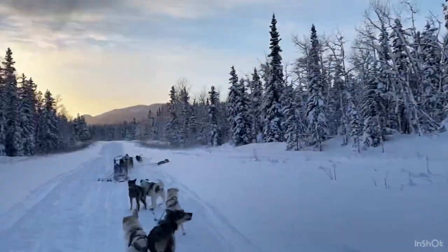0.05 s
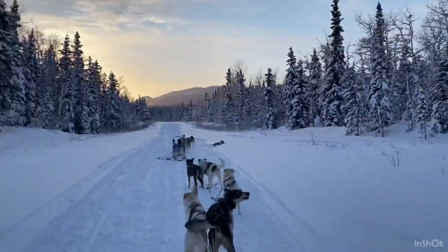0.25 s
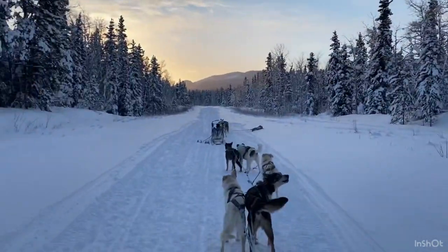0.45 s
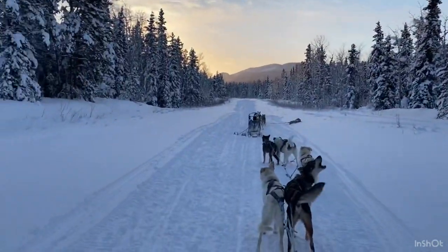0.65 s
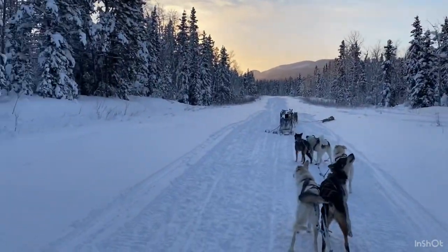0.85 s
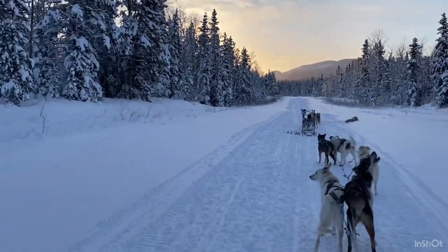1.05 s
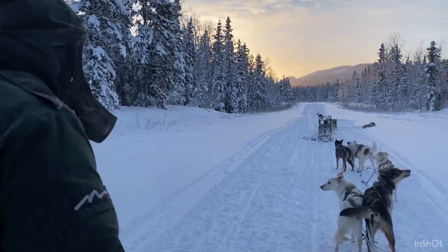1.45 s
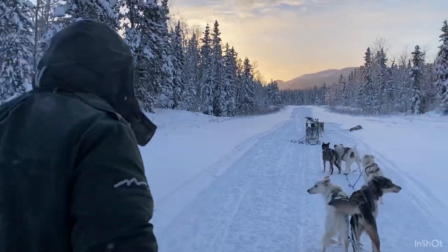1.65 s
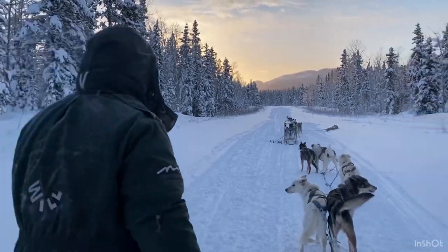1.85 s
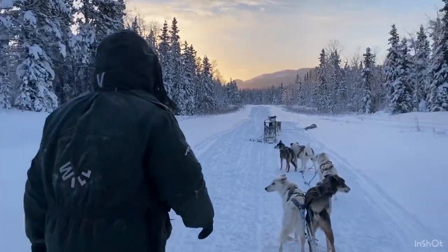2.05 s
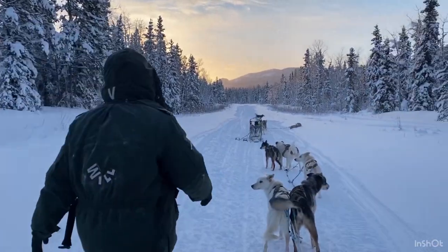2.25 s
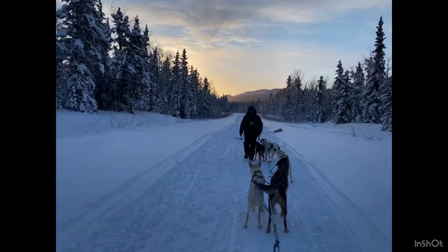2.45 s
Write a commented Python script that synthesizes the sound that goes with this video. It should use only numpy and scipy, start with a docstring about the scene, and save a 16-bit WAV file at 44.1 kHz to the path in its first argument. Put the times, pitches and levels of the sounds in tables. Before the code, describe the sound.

A sled dog barks gruffly four times close by while other dogs whine and yelp.

```python
"""A snowy trail among trees, harnessed sled dogs waiting, a stereo microphone beside the nearest.
Close up, that dog gives four gruff barks, two voices beating in its throat. Further up the line its
team mates whine thinly through the nose and yelp. Someone walks past the microphone, coat rustling
and boots crunching in the snow. The sound stops dead shortly before the end."""
import sys
import numpy as np
from scipy import signal
from scipy.fft import rfft, irfft
from scipy.io import wavfile
from scipy.ndimage import uniform_filter1d, minimum_filter1d

SR = 44100
rng = np.random.default_rng(int(sys.argv[2]) if len(sys.argv) > 2 else 0)


def persist_wave(psi):
    """Save psi, clipped to +-1, as 16-bit WAV."""
    counts = np.round(np.clip(psi, -1, 1) * 32767).astype(np.int16)
    wavfile.write(sys.argv[1], SR, np.atleast_2d(counts).T)


N = 114660
T = np.arange(N) / SR

# The nearest dog's barks, levels relative:
# start t/s, attack/s, hold/s, release/s, level/dB, whoop t/s, whoop level/dB, teeth hiss level/dB
BARKS = [(.306, 0.043, 0.039, 0.046, -11.5, 0.49, -40, -47.5),
         (0.615, 0.038, 0.056, 0.052, -12, .793, -20, -52.5),
         (0.923, 0.03, .025, 0.08, -11, 1.082, -20, -52.5),
         (1.255, 0.054, 0.033, 0.074, -15.5, 1.383, -22.5, -53.5)]
# Pitch arches of each bark: middle t/s, half length/s, top f/Hz of the low voice, then of the high
PITCH_ARCHES = [(.382, 0.066, 438.7, 0.38, 0.089, 502.5), (.71, .086, 426, .712, .102, 512),
                (1.005, .092, 427.9, 1.01, 0.089, 521), (1.345, 0.065, 422.3, 1.36, 0.088, 530)]

def bark(start, attack, hold, release, level_db, whoop_s, whoop_db, hiss_db, arches):
    """Close up: two voices arch in pitch and beat; the higher closes with a clear, falling whoop."""
    t = np.arange(start - .08, start + .22, 1 / SR)
    rise = np.maximum(1 - (t - start) / attack, 0)
    fall = np.maximum((t - start - attack - hold) / release, 0)
    push = amp(-13.5 * (rise ** 2 + fall ** 1.37))
    effort = amp(level_db) * push
    whoop = np.exp(-((t - whoop_s) / .02) ** 2)
    strain = push ** .21 * (1 - .5 * whoop)
    murmur = amp(level_db - 25) * np.exp(-((t - arches[0]) / .12) ** 4)  # faint, around the bark
    flutter_hz = 88 * (1 + .2 * wobble(t, rate_hz=88))
    flutter = 1 + .3 * strain * np.cos(angle(flutter_hz))  # loose throat tissue chops the rasp
    low = arches[:3], .36, amp(-1), 0
    high = arches[3:], .44, 1, amp(whoop_db) * whoop + murmur
    tone, drive = 0, 0
    for (mid, half, top_hz), rest_share, weight, hum in (low, high):
        arch = 1 / (1 + np.abs((t - mid) / half) ** np.where(t < mid, 5, 8))
        climb = 1 + .6 * (t - mid)
        hz = top_hz * (rest_share + (1 - rest_share) * arch * climb)
        phase = angle(hz * (1 + .0497 * strain * wobble(t, rate_hz=158)))
        force = weight * effort * (hz / top_hz) ** 2.55
        shake = 1 + .98 * strain * np.tanh(wobble(t, rate_hz=50))
        tone += (force + np.sqrt(2) * hum) * np.cos(phase) * shake
        drive += (force + amp(-19) * hum) * rasp(phase, rough=.27 + .17 * strain)
    hiss = highpass(rng.standard_normal(len(t)), hz=3500)
    gruff = np.sqrt(np.mean(effort ** 2)) * jaw(drive * flutter, t - start - attack)
    return t[0], amp(hiss_db) * push * hiss - amp(-5) * tone - amp(-.58) * gruff


def rasp(phase, rough):
    """Pulses of the vocal folds mixed with a puff of air in each cycle."""
    folds = sum(np.cos(k * phase) for k in range(1, 9))
    puffs = (1 + np.cos(phase)) * rng.standard_normal(len(phase))
    return (1 - rough) * unit(folds) + 2 * rough * unit(puffs)


# Throat resonances of the nearest dog: f/Hz, relative level/dB
BARK_THROAT = [(170, -45), (280, -29.5), (380, -3.5), (520, -4), (690, -3), (850, 5), (1000, 2.5),
               (1280, -6.5), (1560, -1.5), (1720, -9.5), (2050, -9), (2380, -15), (2700, -38.5),
               (3050, -28.5), (3600, -44), (5600, -39.5), (7500, -49), (15000, -56.5)]

def jaw(x, since_widest, open_s=.016, close_s=.078, muffle_hz=1754):
    """The jaws snap open and close slowly; half shut, they muffle the throat."""
    wide = colour(x, BARK_THROAT)
    shut = signal.sosfiltfilt(signal.butter(3, muffle_hz, fs=SR, output="sos"), wide)
    opening = np.exp(np.minimum(since_widest / open_s, -since_widest / close_s))
    return shut + (wide - shut) * opening


# The same dog's growls: start t/s, length/s, f/Hz, level/dB
GROWLS = [(.548, 0.082, 162, -43), (1.14, 0.12, 173.5, -42.5)]

def growl(start, length, hz, db):
    """A faint low hum in the throat as the next bark builds."""
    t = np.arange(0, length, 1 / SR)
    phase = angle(hz * (1 + .02 * wobble(t, rate_hz=40)))
    return start, amp(db) * swell(t, length) * unit(np.sin(phase))


# The team's whines, one curve each: t/s, f/Hz, level/dB, octave level/dB
WHINES = [
    [(0, 1620, -22, -42.5), (.03, 1569, -21.5, -53.5), (.05, 1542, -20, -69), (.22, 1571, -18, -67),
     (.255, 1565, -26, -66), (.283, 1577, -7.5, -68), (.31, 1544, -21.5, -72)],
    [(1.13, 1300, -55, -63), (1.2, 1511, -28.5, -47.5), (1.256, 1592, -29, -50.5), (1.33, 1617, -25, -56),
     (1.41, 1602, -27, -48.5), (1.43, 1485, -37, -52), (1.45, 1150, -50, -52)],
    [(1.44, 1640, -63, -79), (1.5, 1602, -35.5, -78), (1.6, 1600, -63, -75)],
    [(1.68, 901, -43, -67), (1.72, 1360, -34.5, -44), (1.755, 1539, -23, -49), (1.796, 1583, -34, -47.5),
     (1.84, 1578, -39, -44.5), (1.862, 1566, -28, -71), (1.885, 1577, -43, -57.5), (1.95, 1608, -34, -70)],
    [(1.95, 1572, -44, -66), (1.975, 1664, -27.5, -51), (1.999, 1591, -32, -47), (2.027, 1624, -26, -35),
     (2.045, 1654, -28.5, -50), (2.115, 1663, -21, -37), (2.16, 1655, -20, -54), (2.19, 1658, -24.5, -38),
     (2.235, 1641, -20, -37.5), (2.252, 1612, -35, -48), (2.262, 1668, -34.5, -65), (2.3, 1628, -36.5, -52),
     (2.335, 1590, -46, -63)],
]
# Where each whine sits at the microphone: left lead/ms, left minus right level/dB
WHINE_PLACES = [(-.27, -2), (.25, 0), (.2, 0), (.17, -1), (.16, 1.5)]
# Overtones: harmonic number, level offset/dB, share by which it follows the whistle, not the octave
WHINE_OVERTONES = [(3, -23, .5), (4, -16, .15), (6, -27, .2)]

def whine(curve, where):
    """A thin nose whistle off to one side, hoarse below its top note; its overtones sit dead centre."""
    times, *columns = np.transpose(curve)
    t = np.arange(times[0], times[-1], 1 / SR)
    hz, db, octave_db = (np.interp(t, times, column) for column in columns)
    jitter = .004 * wobble(t, rate_hz=43)
    hoarseness = .22 * (1 - hz / hz.max()) * wobble(t, rate_hz=150)
    phase = angle(hz * (1 + jitter + hoarseness))
    upper = amp(octave_db) * np.sin(2 * phase)
    for k, offset_db, share in WHINE_OVERTONES:
        flicker_db = 3.5 * wobble(t, rate_hz=55)
        upper += amp(octave_db + share * (db - octave_db) + offset_db + flicker_db) * np.sin(k * phase)
    gate = np.clip(np.minimum(t - times[0], times[-1] - t) / .0025, 0, 1)
    flow = np.sqrt(2) * gate * (1 + .11 * wobble(t, rate_hz=55))
    return times[0], place(flow * amp(db) * np.sin(phase), *where) + flow * upper


# One short squeal: start t/s, length/s, f/Hz, level/dB
SQUEAL = (0, .05, 1062, -34)

def squeal(start, length, hz, db):
    """Right of centre, a reedy second voice under the first whine; its upper harmonics die first."""
    t = np.arange(0, length, 1 / SR)
    phase = angle(hz * (1 + .004 * wobble(t, rate_hz=39)))
    slope_db = -3.2 * (1 + (t / .06) ** 2)
    tone = sum(amp(slope_db * k) * np.sin(k * phase) for k in range(1, 8))
    gate = np.clip(np.minimum(t, length - t) / .0032, 0, 1)
    return start, place(amp(db) * unit(tone) * gate, lead_ms=-.13, pan_db=-5)


# The team's lower cries:
# start t/s, length/s, level/dB, middle f/Hz, rise/(share per s), left lead/ms, left minus right/dB
YELPS = [(0.184, .1, -18, 660, 3.22, -0.75, -4.5), (1.288, .11, -21, 620, 0.49, -.65, -11.5),
         (1.713, 0.1405, -33, 652.4, 0.715, 0.15, 3.5)]
# Throat resonances of the yelping dogs: f/Hz, relative level/dB
YELP_THROAT = [(200, -40), (430, -4.5), (660, 11), (1000, -2.5), (1400, -1), (2200, -8), (2800, -35.5),
               (7000, -32), (14000, -54.5)]

def yelp(start, length, db, hz, rise, lead_ms, pan_db):
    """A hoarse, rising cry from a dog further up the line."""
    t = np.arange(0, length, 1 / SR)
    glide = 1 + rise * (t - length / 2)
    phase = angle(hz * glide * (1 + .075 * wobble(t, rate_hz=120)))
    voice = colour(rasp(phase, rough=.3), YELP_THROAT)
    return start, place(amp(db) * np.sqrt(swell(t, length)) * voice, lead_ms, pan_db)


# The walker's movements: t/s, swish level/dB, thud and rub level/dB
WALK = [(0, -51, -48.5), (.3, -49, -40), (.5, -61, -50), (.58, -55.5, -38.5), (1.11, -58, -53),
        (1.179, -45, -34), (1.401, -50.5, -45), (1.53, -54, -44), (1.58, -48, -41), (1.832, -42, -43),
        (1.855, -50.5, -53), (1.99, -58.5, -50.5), (2.015, -51.5, -45.5), (2.12, -42, -38.5),
        (2.242, -45, -36), (2.33, -52.5, -42.5)]
# Spectra of the coat's swish and of its low rub: f/Hz, relative level/dB
SWISH_SPECTRUM = [(500, 0.5), (1500, 11), (3800, 3.5), (6000, -1.5), (9000, -4.5), (15000, -9)]
RUB_SPECTRUM = [(20, -18), (45, -14.5), (90, -2), (200, -2), (480, -1.5), (780, 4), (1150, -4), (1900, -13),
                (6000, -58.5)]

def coat(near_s=1.1, far_hz=7500):
    """Cloth swishes and rubs, duller until the walker comes near the microphone."""
    times, swish_db, rub_db = np.transpose(WALK)
    friction = pair(rng.standard_normal(N), apart=1) * amp(1.6 * wobble(T, rate_hz=50))
    swish = colour(friction, SWISH_SPECTRUM) * amp(np.interp(T, times, swish_db))
    dull = signal.sosfiltfilt(signal.butter(4, far_hz, fs=SR, output="sos"), swish)
    nearness = np.clip((T / near_s) ** 2, .35, 1)
    rub = colour(pair(rng.standard_normal(N), apart=.4), RUB_SPECTRUM)
    rub *= amp(np.interp(T, times, rub_db) + 2.4 * wobble(T, rate_hz=25))
    return dull + (swish - dull) * nearness + rub


# Footfalls beside the microphone: start t/s, length/s, level/dB
FOOTFALLS = [(1.461, 0.054, -47), (1.88, 0.12, -47.5)]
# Spectrum of crushed snow: f/Hz, relative level/dB
SNOW_SPECTRUM = [(500, -18), (2500, -13), (3900, 10), (6000, -4.5), (10000, -0.5), (15000, -4)]

def boots(grains_per_s=2530):
    """Each boot crushes a cloud of snow grains."""
    steps = np.zeros((2, N))
    for start, length, db in FOOTFALLS:
        t = np.arange(0, length, 1 / SR)
        grains = unit(rng.standard_normal(len(t)) * (rng.random(len(t)) < grains_per_s / SR))
        crunch = colour(pair(grains, apart=.53), SNOW_SPECTRUM)
        add(steps, start, amp(db) * swell(t, length) * crunch)
    return steps


def echoes(x, t60_s, lowest_hz):
    """Scattered reflections, different at each microphone port and weak in the bass."""
    t = T[:SR // 2]
    tail = rng.standard_normal((2, len(t))) * amp(-60 * t / t60_s)
    tail /= np.linalg.norm(tail, axis=1, keepdims=True)
    return signal.fftconvolve(x, highpass(tail, lowest_hz), axes=1)[:, :N]


def place(x, lead_ms, pan_db):
    """Puts a sound to one side by arrival time and level; positive is left."""
    side = np.array([[.5], [-.5]])
    khz = np.fft.rfftfreq(len(x), 1000 / SR)
    return irfft(rfft(x) * np.exp(2j * np.pi * khz * lead_ms * side), len(x)) * amp(pan_db * side)


def pair(x, apart):
    """Two microphone ports: the same sound plus unrelated noise at each."""
    return x + apart * rng.standard_normal((2, len(x)))


def amp(db):
    """Decibels to gain."""
    return 10 ** (np.asarray(db) / 20)


def unit(x):
    """Scales to rms 1."""
    return x / np.sqrt(np.mean(x ** 2) + 1e-20)


def add(mix, start, sound):
    """Mixes a sound in at a time in seconds."""
    part = mix[..., max(round(start * SR), 0):][..., :sound.shape[-1]]
    part += sound[..., :part.shape[-1]]


def colour(x, spectrum):
    """Filters by a spectrum of (f/Hz, level/dB) points; rms 1."""
    f, db = np.transpose(spectrum)
    hz = np.fft.rfftfreq(x.shape[-1], 1 / SR)
    gain = amp(np.interp(np.log(hz + 1), np.log(f + 1), db))
    return unit(irfft(rfft(x) * gain, x.shape[-1]))


def highpass(x, hz):
    """Second-order low cut."""
    return signal.sosfilt(signal.butter(2, hz, "high", fs=SR, output="sos"), x)


def wobble(t, rate_hz):
    """Random wavering up to a rate, rms about 1."""
    hz = np.fft.rfftfreq(N, 1 / SR)
    return unit(irfft(rfft(rng.standard_normal(N)) / (1 + (hz / rate_hz) ** 4), N))[:len(t)]


def angle(hz):
    """Running phase of a pitch curve, from a random start."""
    return 2 * np.pi * (np.cumsum(hz) / SR + rng.random())


def swell(t, length):
    """A rounded rise and fall."""
    return np.abs(np.sin(np.pi * t / length)) ** .814


def scene():
    """The near dog and its reflections, the team beyond, a faint return from the trees, the walker."""
    near, team = np.zeros((2, N)), np.zeros((2, N))
    for row, arches in zip(BARKS, PITCH_ARCHES):
        add(near, *bark(*row, arches))
    for row in GROWLS:
        add(near, *growl(*row))
    for curve, where in zip(WHINES, WHINE_PLACES):
        add(team, *whine(curve, where))
    for row in YELPS:
        add(team, *yelp(*row))
    add(team, *squeal(*SQUEAL))
    reflections = amp(-2.5) * echoes(near, t60_s=.033, lowest_hz=1270)
    dogs = near * amp([[.4], [-.4]]) + reflections + team
    trees = amp(-19) * echoes(dogs, t60_s=.27, lowest_hz=499)
    walker = (coat() + boots()) * amp([[.8], [-.8]])  # slightly left
    return dogs + trees + walker


# Phase between the microphone's two ports: f/Hz, left lead/rad
PORT_PHASE = [(0, 0), (7000, -.3), (8500, -3.1), (9400, -5.9), (10800, -6.6), (11900, -9.2), (12700, -9.7),
              (13300, -12.3), (15400, -13)]

def record(dry, ceiling=.93, stop_s=2.333, top_hz=15600):
    """The ports drift apart in phase in the treble; then a peak limiter, a dead stop, a band limit."""
    lead = np.interp(np.fft.rfftfreq(N, 1 / SR), *np.transpose(PORT_PHASE))
    ports = irfft(rfft(dry) * np.exp(1j * lead * np.array([[.5], [-.5]])), N)
    safe_gain = np.minimum(1, ceiling / (np.abs(ports).max(0) + 1e-9))
    limiter = uniform_filter1d(minimum_filter1d(safe_gain, size=201), size=201)
    stop = np.clip((stop_s - T) / .0017 + 1, 0, 1)
    band_limit = signal.firwin(511, top_hz, window=("kaiser", 9), fs=SR)
    return signal.oaconvolve(ports * limiter * stop, band_limit[None], "same")


dry = scene()
out = record(dry)
persist_wave(out)
```